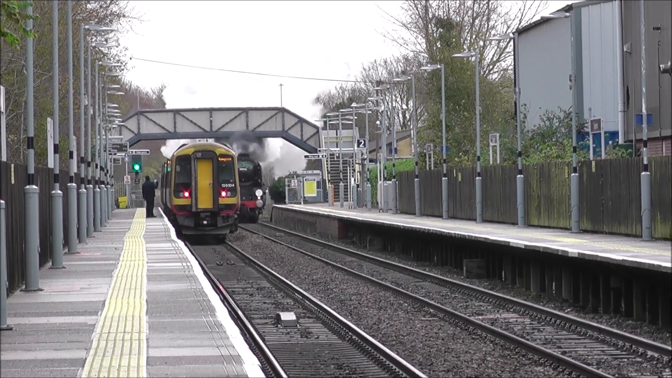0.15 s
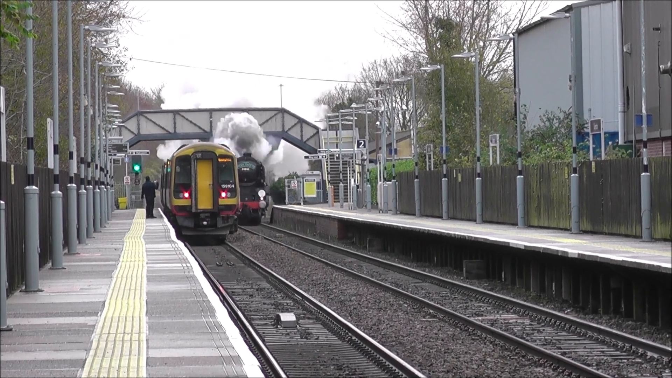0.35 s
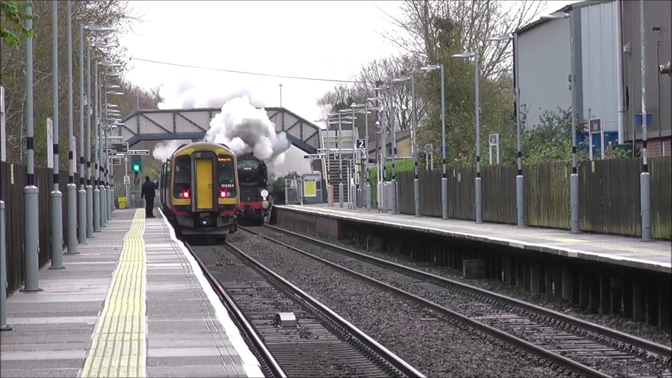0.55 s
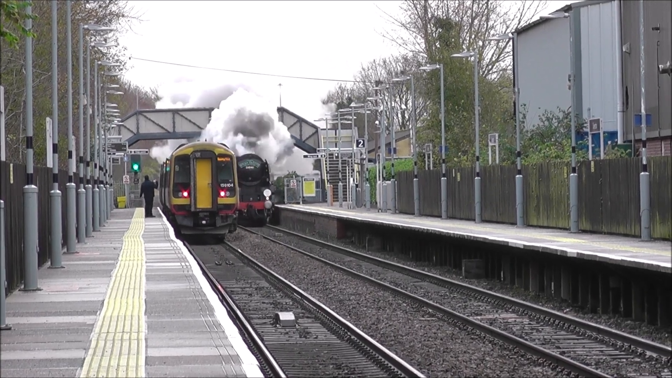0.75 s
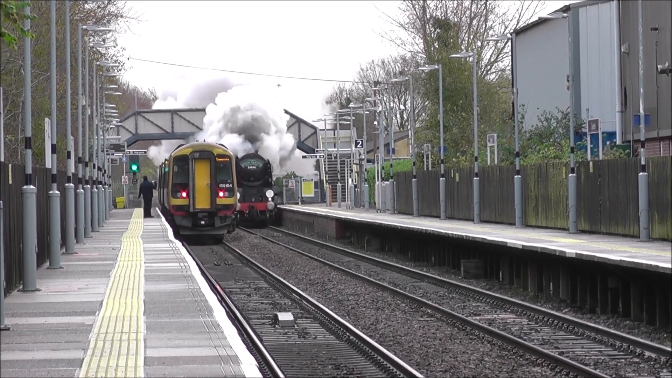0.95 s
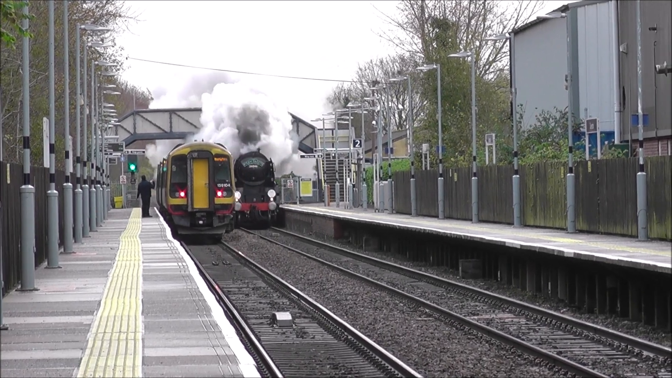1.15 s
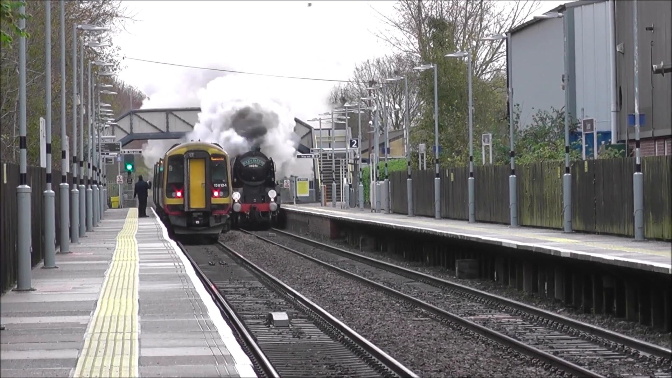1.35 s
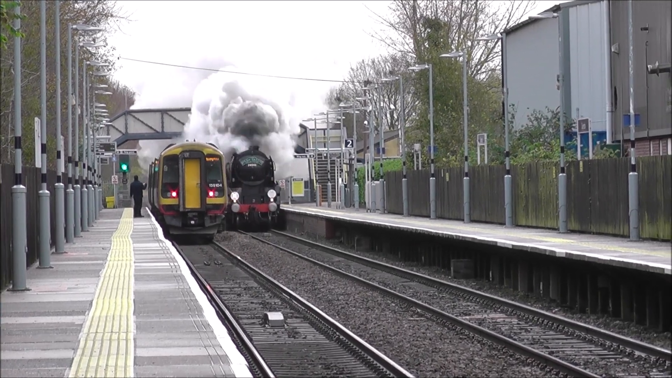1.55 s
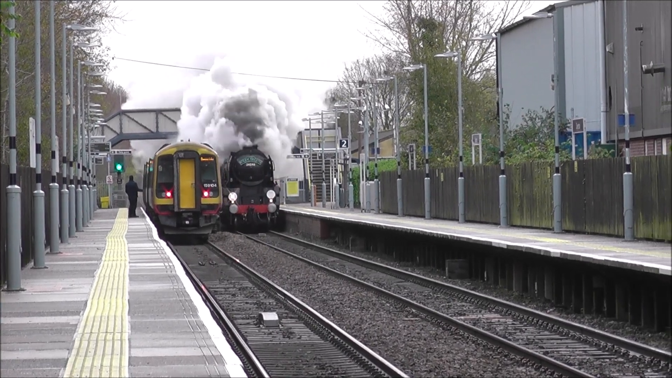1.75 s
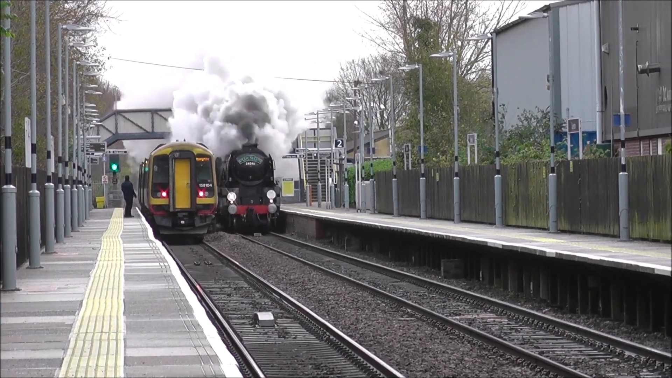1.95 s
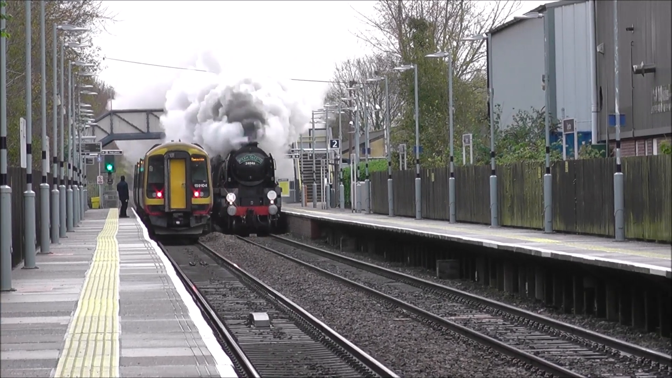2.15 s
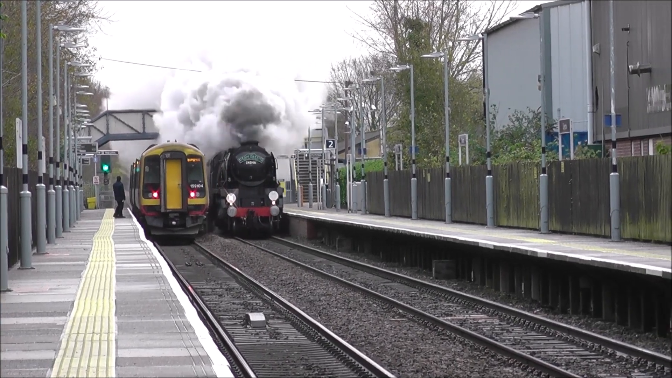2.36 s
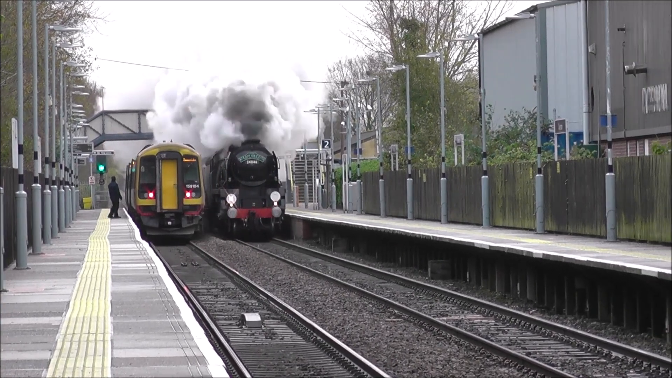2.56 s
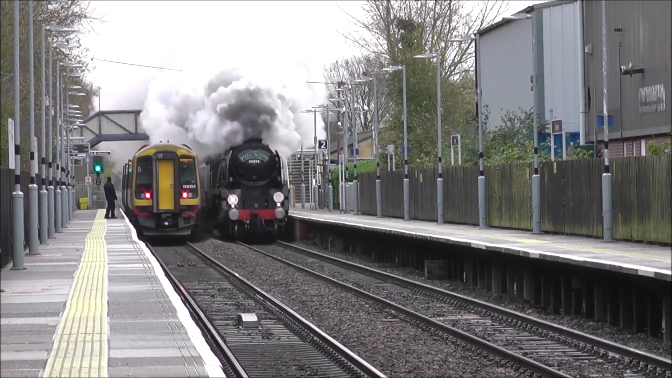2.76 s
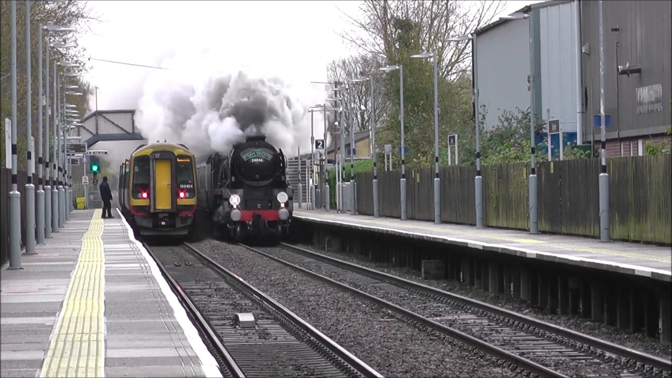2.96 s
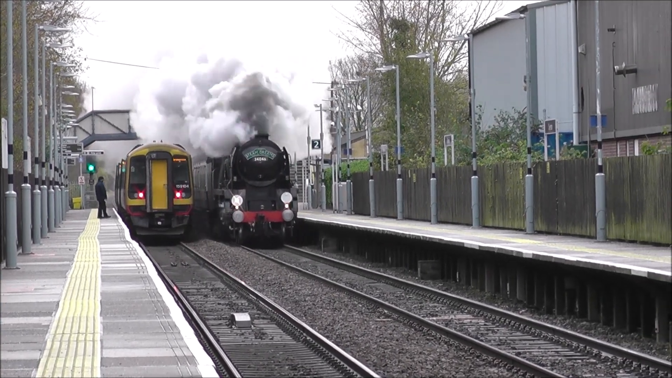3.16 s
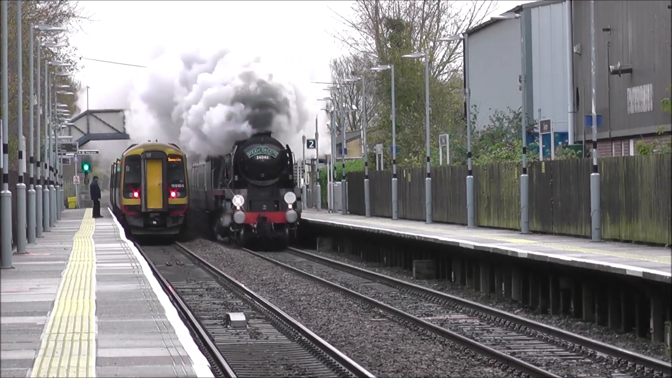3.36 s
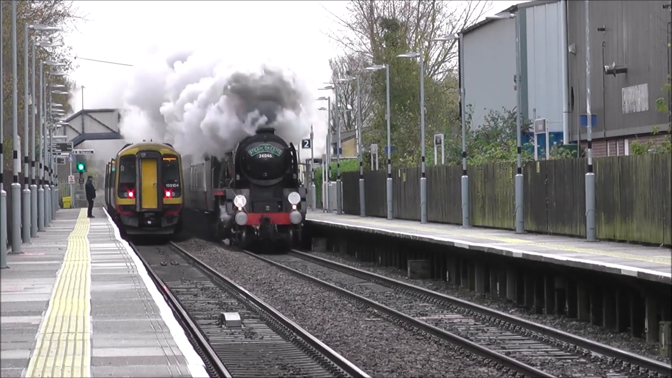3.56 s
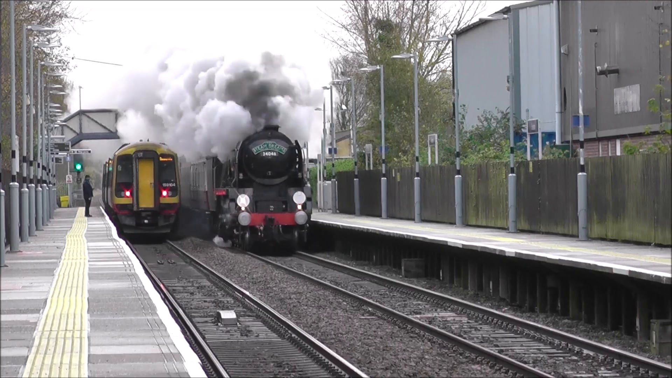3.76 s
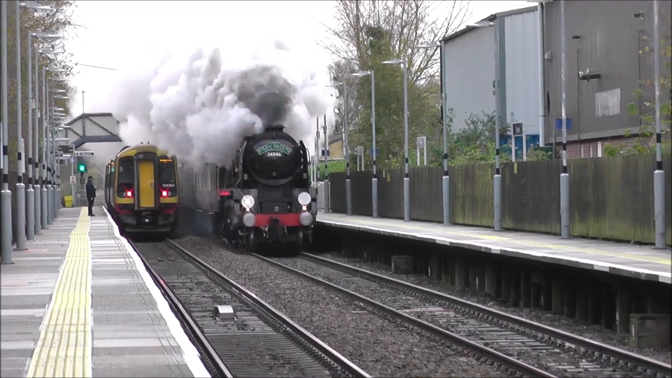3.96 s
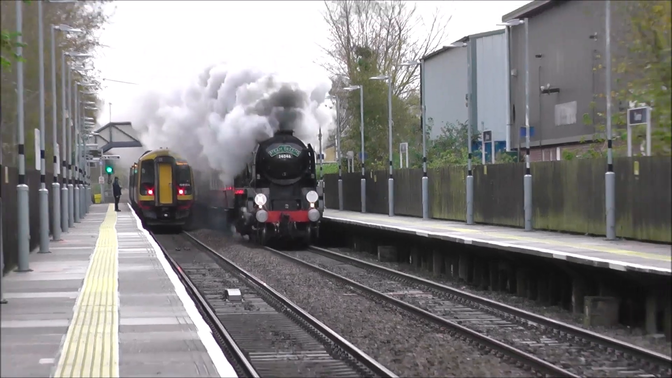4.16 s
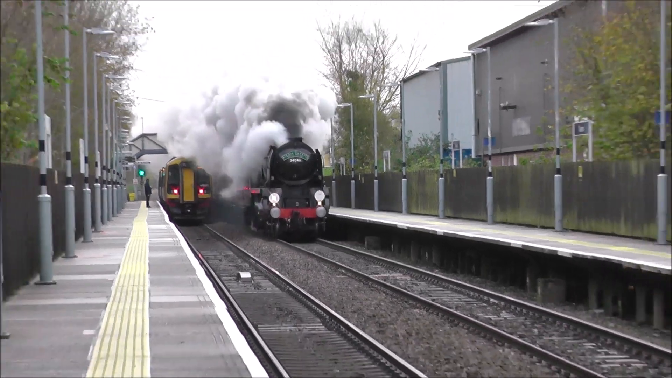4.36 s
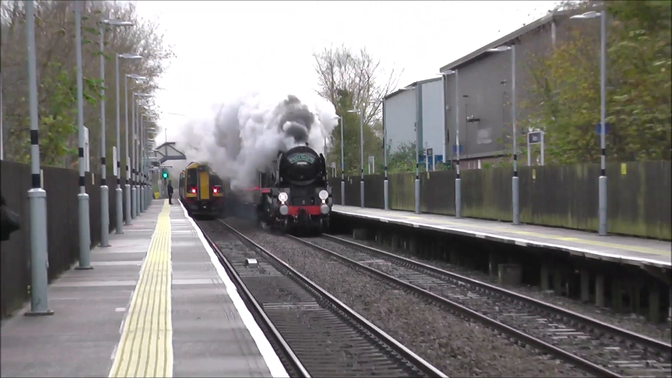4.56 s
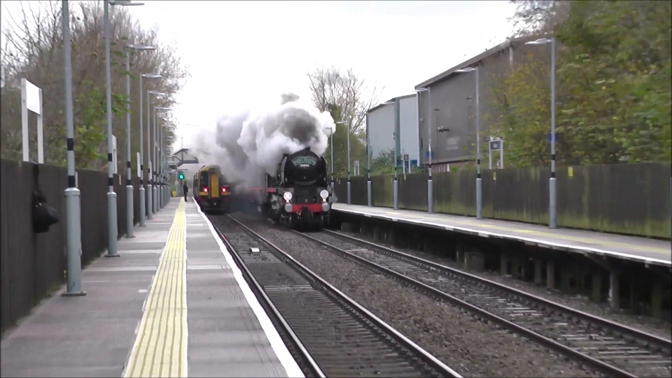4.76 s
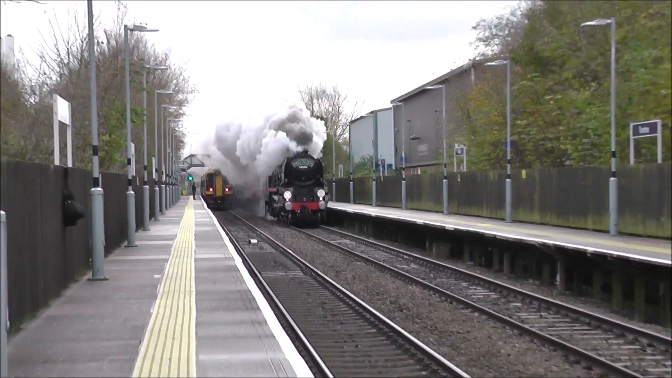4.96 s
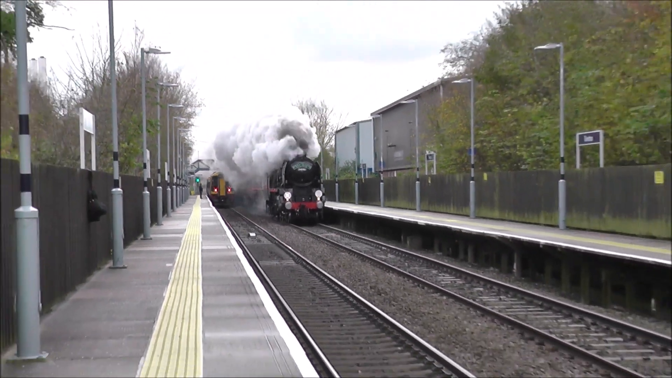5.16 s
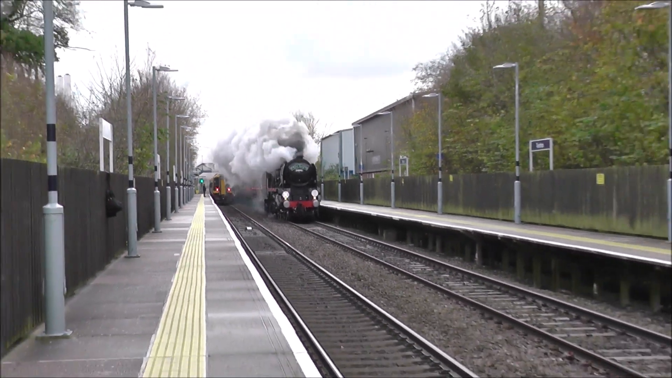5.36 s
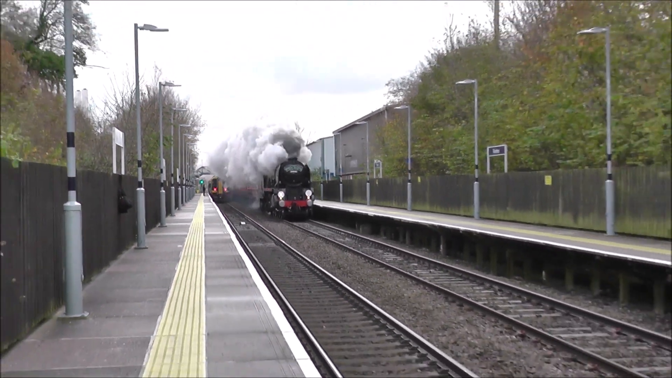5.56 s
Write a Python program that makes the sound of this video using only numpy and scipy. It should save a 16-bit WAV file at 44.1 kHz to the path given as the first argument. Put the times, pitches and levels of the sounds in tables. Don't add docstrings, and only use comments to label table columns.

```python
import sys
import numpy as np
from scipy import signal
from scipy.fft import rfft, irfft, next_fast_len
from scipy.io import wavfile

SR = 44100
rng = np.random.default_rng(int(sys.argv[2]) if len(sys.argv) > 2 else 0)


def undo_db(level):
    steps = np.asarray(level, float) / 20
    return 10 ** steps


def wrap_up_sound(samples):
    columns = np.atleast_2d(samples).T
    tamed = np.clip(columns, -1, 1)
    steps = np.round(tamed * 32767).astype(np.int16)
    wavfile.write(sys.argv[1], SR, steps)


N = 247401


def evened(x):
    return x / np.sqrt(np.mean(x ** 2) + 1e-20)


def read(points, hz):
    f, value = np.transpose(points)
    return np.interp(np.log(hz + 1), np.log(f + 1), value)


def curves(rows):
    s, *columns = np.transpose(rows)
    return [np.interp(np.arange(N) / SR, s, c) for c in columns]


def colour(x, gain):
    size = next_fast_len(N + 4096)
    hz = np.fft.rfftfreq(size, 1 / SR)
    return irfft(rfft(x, size) * gain(hz), size)[:N]


def noise(spectrum):
    (low, low_db), (top, top_db) = spectrum[0], spectrum[-1]
    closed = [(low * 0.8, low_db - 40), *spectrum, (top * 1.2, top_db - 40)]
    return evened(colour(rng.standard_normal(N), lambda hz: undo_db(read(closed, hz))))


def wander(per_s):
    return evened(colour(rng.standard_normal(N), lambda hz: np.exp(-(hz / per_s) ** 2)))


def resonate(x, hz, width):
    turn = np.exp(2j * np.pi * np.cumsum(hz * np.ones(len(x))) / SR)
    r = np.exp(-np.pi * width / SR)
    smooth = signal.lfilter([(1 - r) ** 2], [1, -2 * r, r * r], x / turn)
    return 2 * (turn * smooth).real


def ring(hz, width):
    return evened(resonate(rng.standard_normal(N), hz, width))


def add(mix, s, sound):
    part = mix[round(s * SR):][:len(sound)]
    part += sound[:len(part)]


# time [s], level [dB].
APPROACH_CURVE = [(0, -32), (.71, -33), (.76, -30.5), (1.5, -30), (2.2, -30.5), (2.9, -28.5), (3.6, -28.5),
                  (4.2, -25.5), (4.55, -23), (4.8, -21.5), (5.2, -19.5), (5.5, -18.5), (5.61, -17)]
# time [s], level [dB].
RAIL_SONG_CURVE = [(0, -48.5), (.44, -45.5), (.8, -43.5), (1.17, -40), (1.7, -40), (2.26, -38.5),
                   (2.7, -36.5), (3.15, -33), (3.6, -32.5), (4.19, -32), (4.7, -30.5), (5.2, -29.5),
                   (5.61, -28)]


def level_db(law):
    db, by_near, by_song, flutter_db = law
    near = curves(APPROACH_CURVE)[0] + 30
    song = curves(RAIL_SONG_CURVE)[0] + 36
    flutter = flutter_db * wander(per_s=9.2)
    return db + by_near * near + by_song * song + flutter


# time [s], level [dB], fading time [s].
JOINTS = [(.735, 13, 0.044), (1.56, 3, 0.048), (3.09, 4.5, 0.045), (3.69, 4.5, 0.12), (3.82, 4.5, 0.17),
          (4.6, 6, 0.028), (4.73, 0, 0.032), (4.88, -1.5, .05), (5.09, -0.5, 0.045), (5.3, 0, .06),
          (5.49, -3, 0.054)]


def jolts_db():
    t = np.arange(N) / SR
    return sum(db * (t > s) * np.exp(-np.maximum(t - s, 0) / fading) for s, db, fading in JOINTS)


# frequency [Hz], density [dB per Hz].
SHAKE_SPECTRUM = [(8.8, -36), (15, 1), (38, 3), (54, 7.5), (69, -1), (103, -12), (108, -3), (125, -11),
                  (160, 8.5), (280, -120)]
RUMBLE_SPECTRUM = [(62, -64), (105, -43), (129, -9.5), (194, 2.5), (280, 0.5), (322, -2.5), (360, -1.5),
                   (430, -16.5), (560, -12), (950, -120)]
# time [s], centre [Hz], level against the rumble [dB].
FRAME_BOOM = [(0, 243, -4), (.75, 207, -5), (2., 191, -1.5), (2.6, 260, -7), (3.2, 262.4, 2),
              (3.9, 245, -7), (4.25, 214, 5), (5., 189.5, -3.5), (5.6, 185, 1)]
# level at the reference [dB], share of approach, share of rail song, flutter [dB].
SHAKE_LEVEL = (-42.5, 1.35, 0.19, 1.5)
RUMBLE_LEVEL = (-33, 0.9345, 0.0364, -0.16)


def running_gear():
    boom_hz, boom_db = curves(FRAME_BOOM)
    shake = undo_db(level_db(SHAKE_LEVEL)) * noise(SHAKE_SPECTRUM)
    rumble = noise(RUMBLE_SPECTRUM) + undo_db(boom_db) * ring(boom_hz, width=45)
    return shake + undo_db(level_db(RUMBLE_LEVEL) + jolts_db() - 2) * rumble


# centre [s], length [s], swell [dB].
ROUGH_RAIL = [
    (.2, 0.15, 2),
    (1.573, 0.13, 2),
    (1.84, .12, 1),
    (3.56, 0.36, 3),
    (3.953, 0.75, 6),
    (4.33, 0.34, 2.5),
    (4.58, 0.22, 4.5),
    (4.932, .12, 3),
    (5.113, 0.12, 1),
]


def surges_db():
    t = np.arange(N) / SR
    return sum(db * np.cos(np.pi * np.clip((t - s) / length, -0.5, 0.5)) ** 2
               for s, length, db in ROUGH_RAIL)


# frequency [Hz], density [dB per Hz].
ROAR_SPECTRUM = [(220, -47), (380, -3.5), (424, -3), (545, 1.5), (664, 0.5), (837, -2), (1000, -5.5),
                 (1300, -18), (2200, -120)]
DRONE_SPECTRUM = [(560, -19), (950, -11), (1130, 0), (1250, 1), (1600, -8.5), (2080, -38), (3520, -120)]
# frequency [Hz], width [Hz], level [dB].
FRAME_TONES = [(557.3, 27, -15), (676.4, 39, -9.5)]
# frequency [Hz], density [dB per Hz].
DISTANT_RAIL = [(1300, 3.5), (1500, -5.5), (1900, 2), (2300, -5.5), (3200, -4.5), (4300, -11.5),
                (4800, -16.5), (6000, -17.5), (7500, -50), (8500, -61)]
CLOSE_RAIL = [(1300, -27), (1500, -6.5), (2000, -0.5), (2600, 0), (3400, -2), (4300, -3.5), (4700, -7),
              (5500, -6), (6500, -12), (7500, -30.5), (8500, -24)]
# frequency [Hz], width [Hz], level [dB].
RAIL_RINGS = [(2197, 19, -17.5), (5390, 70, -27)]
# level at the reference [dB], share of approach, share of rail song, flutter [dB].
ROAR_LEVEL = (-33, 1.0426, .05, 1.35)
DRONE_LEVEL = (-31.5, 0.47, 0.6539, 1.07)
RAIL_LEVEL = (-32, 0.1354, 1.02, 0.05)
# frequency [Hz], width [Hz], level [dB].
DISC_MODES = [
    [(1750, 330, -2)],
    [(3105, 60, -8), (3130, 230, -1)],
    [(3623, 90, -4), (3760, 110, -4)],
    [(4210, 24, -4), (4311, 24, -5), (4240, 280, 0)],
]
# level at the reference [dB], share of flange bite, share of the surges.
DISC_LEVELS = [(-40.5, 0.92, .9), (-45, 1.02, .05), (-44.5, 0.86, 0.045), (-49, 1.14, 0.055)]
# time [s], level [dB].
FLANGE_BITE = [(0, -53), (.45, -46.5), (.7, -52), (.8, -44), (1.15, -44), (1.4, -44.5), (2.1, -41),
               (2.5, -35), (2.85, -33), (3.15, -26.5), (3.5, -31), (3.9, -31), (4.3, -29), (4.5, -32),
               (4.8, -26.5), (5.2, -27), (5.61, -26.5)]


def wheels():
    surge = surges_db()
    roar_db = level_db(ROAR_LEVEL) + 0.21 * jolts_db()
    drone_db = level_db(DRONE_LEVEL) + surge
    rail_db = level_db(RAIL_LEVEL)
    roar = noise(ROAR_SPECTRUM) + sum(undo_db(db) * ring(hz, width) for hz, width, db in FRAME_TONES)

    far_db, near_db = -36.5, -33.5
    near = np.clip((rail_db - far_db) / (near_db - far_db), 0, 1) ** 2
    rail = np.sqrt(1 - near) * noise(DISTANT_RAIL) + np.sqrt(near) * noise(CLOSE_RAIL)
    rail += sum(undo_db(db + 2.5 * wander(5)) * ring(hz, width) for hz, width, db in RAIL_RINGS)

    out = undo_db(roar_db) * roar + undo_db(drone_db) * noise(DRONE_SPECTRUM)
    out += undo_db(rail_db - 0.28 + 0.88 * wander(20)) * rail
    bite = curves(FLANGE_BITE)[0] + 38
    for (family_db, by_bite, by_surge), modes in zip(DISC_LEVELS, DISC_MODES):
        rings = sum(undo_db(db + 2.5 * wander(13.6)) * ring(hz, width) for hz, width, db in modes)
        out += undo_db(family_db + by_bite * bite + by_surge * surge) * rings
    return out


# time [s], level [dB].
STEAM_LEVEL = [(0.0, -64), (1.51, -62), (2.69, -55.5), (3.25, -48.5), (3.72, -47.5), (4.27, -41),
               (5.16, -39.5), (5.45, -35.5), (5.61, -37.5)]
# frequency [Hz], density [dB per Hz].
JET_SPECTRUM = [(6000, -42), (7000, 6.5), (8200, -3), (9100, 2.5), (10200, -2.5), (11400, -1), (11700, -1),
                (12200, -8), (14000, -13), (15800, -22)]
# start [s], level [dB], centre [Hz], width [Hz], decay [s].
BURSTS = [(0.74, -24, 263, 110, 0.019), (2.0, -37, 4800, 1500, .008), (2.543, -25.5, 3980, 1800, 0.011),
          (3.32, -48, 4490, 2970, .01), (4.17, -36, 9250, 2500, 0.013), (4.245, -37, 9500, 2500, 0.014),
          (4.305, -34, 9100, 2000, .015), (4.53, -38, 10500, 3000, .015), (4.606, -30, 236, 90, 0.027),
          (4.61, -25, 600, 300, 0.017), (2.62, -42, 7330, 700, .02), (4.93, -38, 9800, 3000, .015),
          (1.745, -35, 5660, 1800, .004), (1.82, -51, 5000, 1500, .004), (3.649, -22.5, 3075, 61.3, 0.032),
          (4.69, -28, 3755, 49.5, 0.058)]


def steam():
    jet = undo_db(curves(STEAM_LEVEL)[0] + 0.44 * wander(30)) * noise(JET_SPECTRUM)
    out = jet + undo_db(-77) * ring(11700, width=70)
    t = np.arange(SR // 4) / SR
    rise = 1 - np.exp(-t / 0.0011)
    for s, db, hz, width, decay in BURSTS:
        air = rng.standard_normal(len(t))
        burst = evened(resonate(air, hz, width))
        add(out, s, undo_db(db) * burst * np.exp(-t / decay) * rise)
    return out


def diesel():
    idle_hz, start_lift_hz, rise_s = 140.1, 3, 0.568
    sag_from_s, sag_hz_per_s = 2.5, 3.2
    idle_db, clear_db = -51, -38
    hidden_from_s, hidden_db_per_s = 3.84, -32
    t = np.arange(N) / SR
    start = np.exp(-t / rise_s)
    hz = idle_hz + start_lift_hz * start - sag_hz_per_s * np.maximum(t - sag_from_s, 0)
    turns = np.cumsum(hz + 1.03 * wander(4.16)) / SR
    db = clear_db + (idle_db - clear_db) * start
    db += hidden_db_per_s * np.maximum(t - hidden_from_s, 0)
    octave = undo_db(-7 + 1.7 * wander(0.84)) * np.sin(4 * np.pi * turns)
    return np.sqrt(2) * undo_db(db) * (np.sin(2 * np.pi * turns) + octave)


# start [s], end [s], from [Hz], to [Hz], level [dB].
FAR_BIRD = [(0, .12, 5480, 5400, -63), (.515, .555, 7200, 5600, -55), (.607, .652, 7300, 5600, -52),
            (.63, .72, 7800, 7350, -56), (.692, .737, 7200, 4750, -48), (.795, .84, 6500, 5100, -50),
            (.845, .9, 7050, 6500, -54), (.89, .965, 6600, 4800, -50), (.82, .87, 5300, 5200, -55),
            (1.01, 1.075, 7100, 5300, -52), (1.065, 1.11, 5900, 5650, -54), (1.2, 1.242, 6000, 5600, -51)]
# start [s], end [s], from [Hz], to [Hz], level [dB].
NEAR_BIRD = [
    (1.34, 1.385, 4350, 4650, -43),
    (1.368, 1.38, 4900, 5900, -47),
    (1.372, 1.392, 5900, 5050, -44),
    (1.8, 1.835, 4430, 4560, -46),
    (1.676, 1.684, 7650, 7550, -46),
    (1.684, 1.692, 9100, 8300, -52),
    (1.689, 1.697, 8000, 7500, -46),
    (1.7, 1.709, 7600, 7500, -46),
    (1.711, 1.719, 8800, 7800, -55),
    (1.744, 1.752, 9200, 8700, -58),
]


def birds(notes, wet_db, t60):
    out = np.zeros(N)
    for start, end, from_hz, to_hz, db in notes:
        u = np.linspace(0, 1, round((end - start) * SR))
        hz = from_hz + (to_hz - from_hz) * u ** 1.15
        tone = np.sqrt(2) * np.sin(2 * np.pi * np.cumsum(hz) / SR)
        swell = signal.windows.tukey(len(u), 0.5) * (0.55 + 0.8 * u)
        add(out, start, undo_db(db) * tone * swell)
    out *= 1 + 0.5 * wander(450)
    t = np.arange(SR // 2) / SR
    echoes = rng.standard_normal((2, len(t))) * undo_db(-60 * t / t60) * (t > 0.004)
    echoes /= np.linalg.norm(echoes[0])
    wet = signal.fftconvolve(out[None], echoes, axes=1)[:, :N]
    return out + undo_db(wet_db) * wet


def scatter(x):
    z = signal.stft(x, nperseg=1024)[2]
    z = z * np.exp(2j * np.pi * rng.random(z.shape))
    return np.sqrt(2) * signal.istft(z, nperseg=1024)[1][:N]


# frequency [Hz], share in step, share a quarter turn ahead, unrelated level [dB].
PORT_DIFFERENCE = [(40, -.19, .07, -21), (120, -0.14, 0.086, -23), (200, -0.041, 0.028, -30),
                   (400, -0.053, 0.13, -24), (600, 0.0051, 0.2, -19), (720, 0.14, .12, -18),
                   (820, 0.2, 0.034, -12), (1000, .04, 0.046, -19), (1200, 0.04, -0.093, -27),
                   (1800, 0.016, -.06, -15), (3550, 0, -0.072, -26), (5000, 0, 0, -26),
                   (7000, -0.012, 0, -7), (8750, 0, 0, -18)]


def port_difference(train):
    hz, in_step, ahead, unrelated_db = np.transpose(PORT_DIFFERENCE)
    side = colour(train, lambda f: read(np.c_[hz, in_step], f) + 1j * read(np.c_[hz, ahead], f))
    side += colour(scatter(train), lambda f: undo_db(read(np.c_[hz, unrelated_db], f)))
    off_axis_s = np.maximum(np.arange(N) / SR - 3.9, 0)
    return undo_db(-6 + 6 * off_axis_s) * side


# frequency [Hz], density [dB per Hz].
HISS_SPECTRUM = [(3000, -18), (6000, 4), (7800, -17), (8600, -12), (11600, 1), (13000, -3), (15000, 0),
                 (15800, -4)]


def self_noise():
    return undo_db(-59.5) * noise(HISS_SPECTRUM)


def scene():
    train = running_gear() + wheels() + steam() + diesel()
    far, far_side = birds(FAR_BIRD, wet_db=0, t60=0.4)
    close, _ = birds(NEAR_BIRD, wet_db=-5, t60=0.18)
    mid = train + far + close + self_noise()
    side = port_difference(train) + undo_db(-9.5) * far_side
    return np.array([mid + side, mid - side])


def top_cut(x):
    return signal.sosfilt(signal.butter(12, 15740, fs=SR, output="sos"), x)


def record(dry):
    hollow_hz, hollow_width_hz = 7280, 920
    leak_db, open_leak_db, leak_s, leak_turn_s = -48, -19, 4.65, 0.3
    side_edge_hz, side_top_db = 11600, -2
    mid, side = (dry[0] + dry[1]) / 2, (dry[0] - dry[1]) / 2

    def hollow(hz):
        off = abs(hz - hollow_hz) / hollow_width_hz
        return off ** 1.6 / np.sqrt(1 + off ** 3.2)

    kept = colour(mid, hollow)
    opened = np.clip((np.arange(N) / SR - leak_s) / leak_turn_s + 0.5, 0, 1)
    leak = undo_db(leak_db + (open_leak_db - leak_db) * opened)
    mid = kept + leak * (mid - kept)
    side = colour(side, lambda hz: np.where(hz < side_edge_hz, 1, undo_db(side_top_db)))
    return top_cut(np.array([mid + side, mid - side]))


dry = scene()
out = record(dry)
wrap_up_sound(out)
```